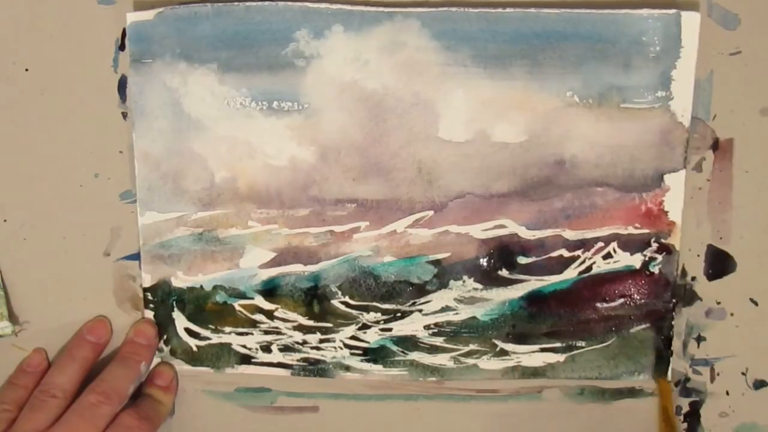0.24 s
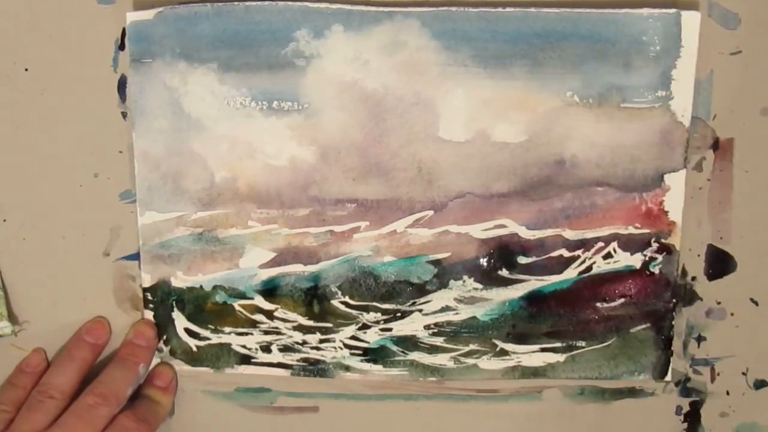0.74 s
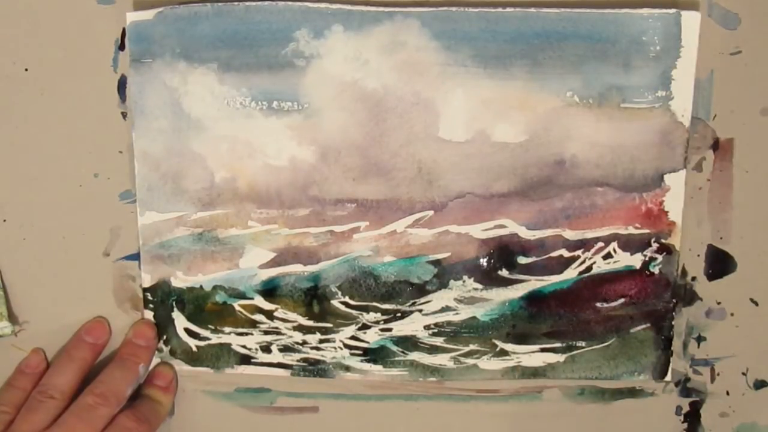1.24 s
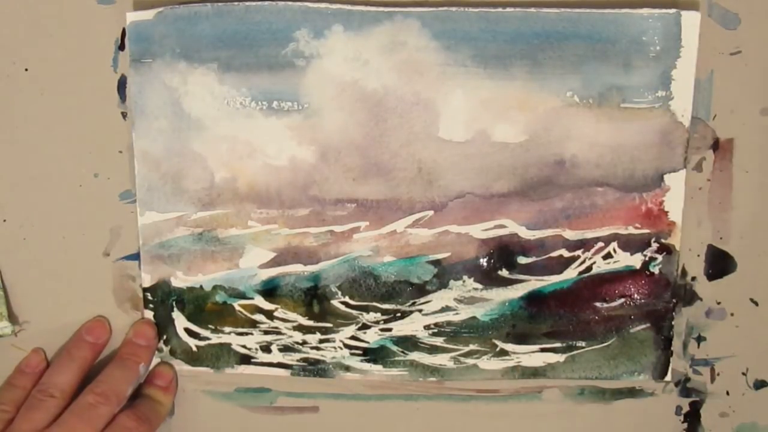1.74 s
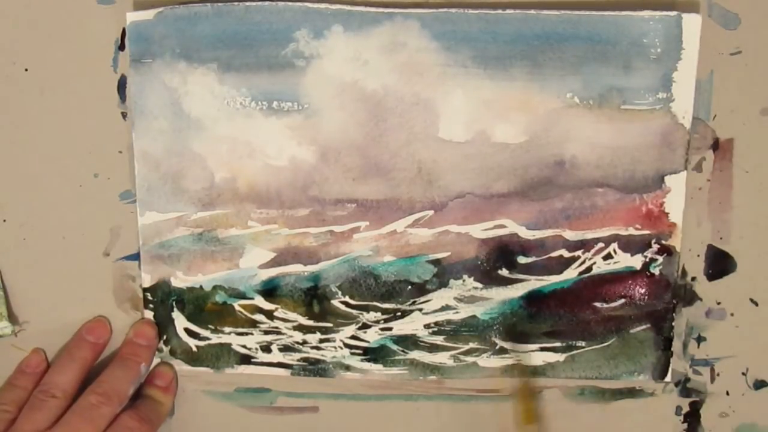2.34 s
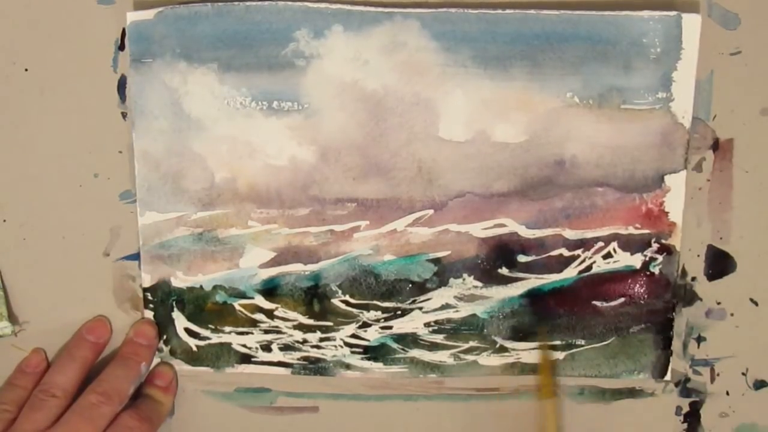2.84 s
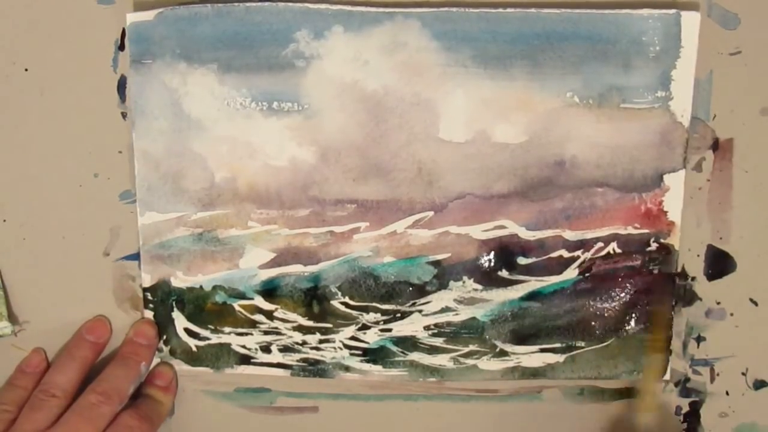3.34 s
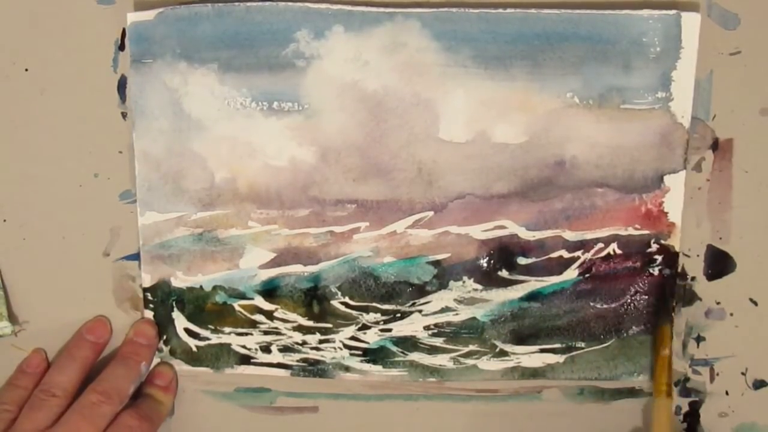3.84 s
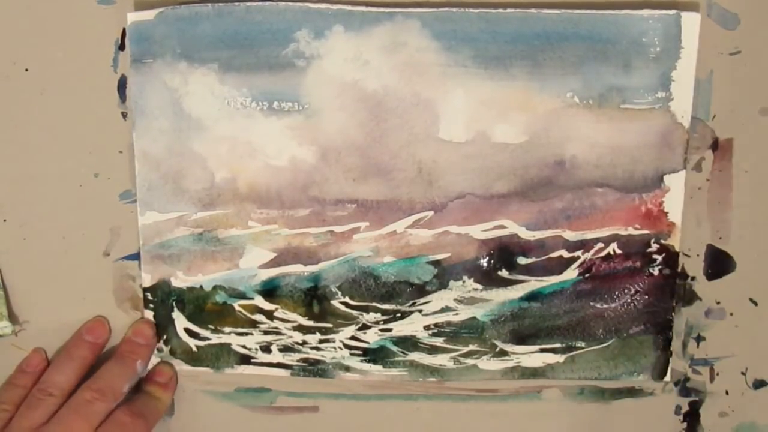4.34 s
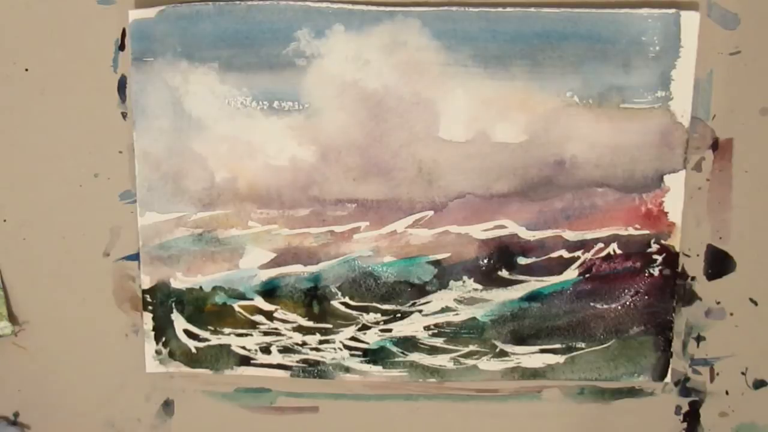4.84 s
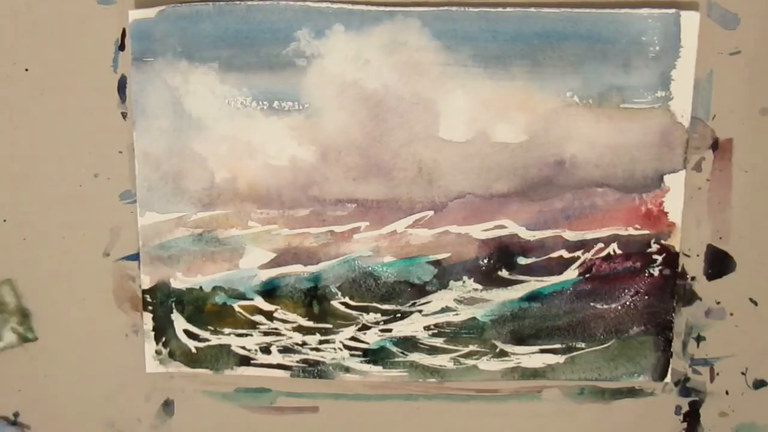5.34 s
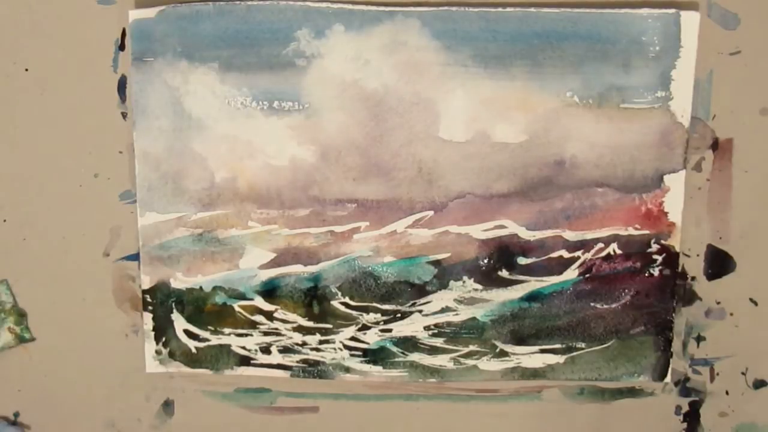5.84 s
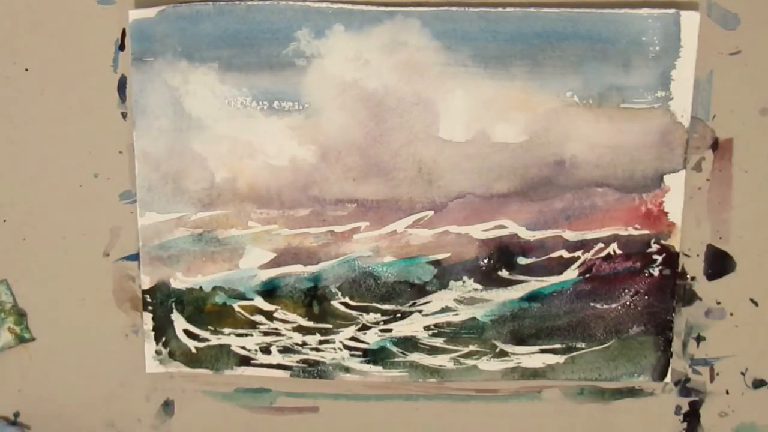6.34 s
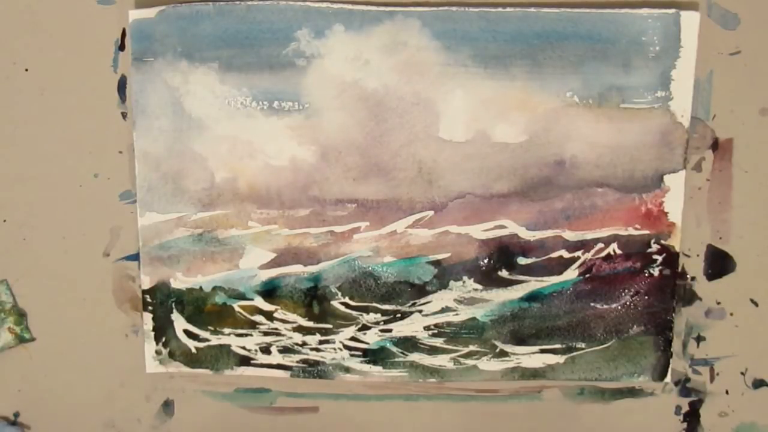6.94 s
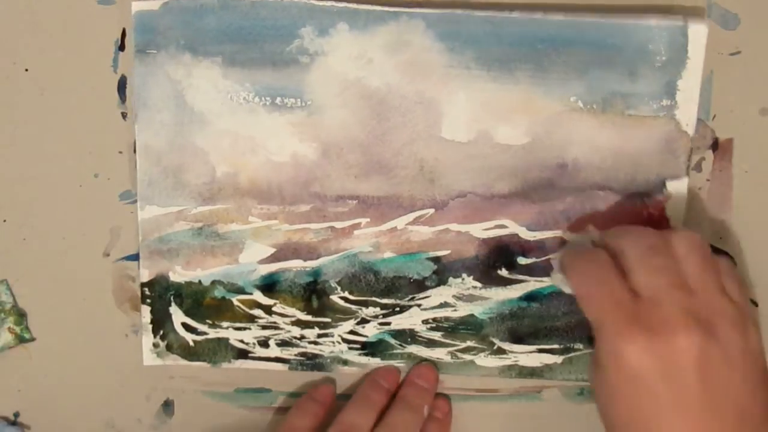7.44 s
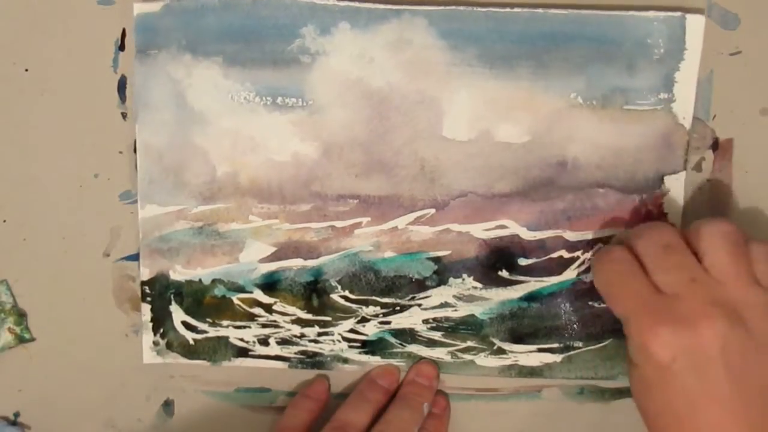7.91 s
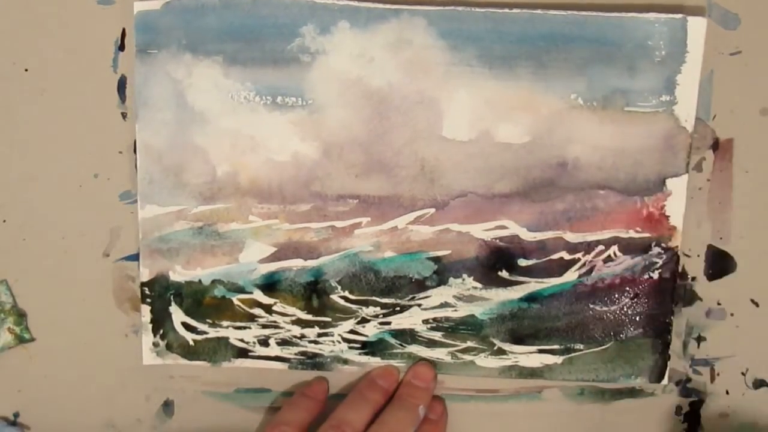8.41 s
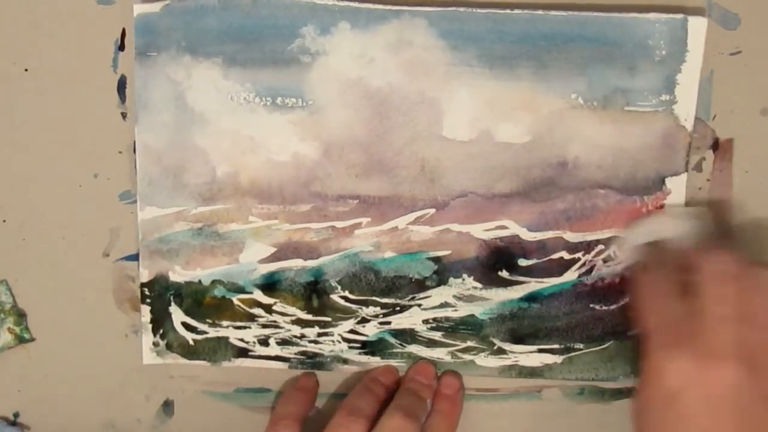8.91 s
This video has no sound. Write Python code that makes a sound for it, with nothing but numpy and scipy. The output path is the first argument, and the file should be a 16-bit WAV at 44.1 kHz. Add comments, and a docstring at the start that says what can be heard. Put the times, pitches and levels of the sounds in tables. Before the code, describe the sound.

First a short burst of bubbling as a brush is swirled in water, a pause, then several light grainy brush strokes on paper. The brush taps the glass jar sharply and swishes faintly. A thump and a stronger wooden clack follow as hard things are set on the table. Tissue crumples and pats the sheet with dull, soft touches. Close, slightly right, in a small room with steady hiss.

```python
"""A wet brush in a water jar, at a table in a small, quiet room: bubbles ring as short rising sines.
The brush also clinks on the jar (ringing modes, ticks) and strokes the paper (shaped, grainy noise).
Hard things are set on the table with a clack, and a hand pats it: modes plus smeared clicks.
A tissue rustles and dabs the sheet. Wide hiss, low wavering hum and faint tones lie behind."""
import sys
import numpy as np
from scipy import signal
from scipy.fft import rfft, irfft, next_fast_len
from scipy.io import wavfile
from scipy.ndimage import uniform_filter1d

SR = 44100
rng = np.random.default_rng(int(sys.argv[2]) if len(sys.argv) > 2 else 0)


def store_pcm(level_fs):
    """Save levels as 16-bit WAV."""
    pcm = np.round(np.clip(level_fs, -1, 1) * 32767).astype(np.int16)
    wavfile.write(sys.argv[1], SR, np.atleast_2d(pcm).T)


N = 404397

# Large air bubbles: t/s, level/dB, starting f/Hz, t60/s
BUBBLES = [(.911, -20, 1011, 0.067), (.980, -18, 1197, 0.09), (.998, -28.5, 1950, 0.021),
           (1.003, -33, 2200, 0.022), (1.014, -39.5, 2610, 0.041), (1.020, -27, 752, 0.14),
           (1.029, -20, 971, 0.045), (1.0559, -22, 1173, 0.04), (1.067, -30, 843, 0.072),
           (1.068, -30.5, 1998, 0.039), (1.070, -24, 1360, 0.048), (1.123, -47.5, 4200, 0.19),
           (1.123, -46, 3950, 0.049), (1.189, -51, 1260, 0.07), (1.236, -38.5, 1324, 0.089),
           (1.27, -35, 1003, 0.06), (1.27, -46, 2520, 0.043), (4.415, -37, 745, 0.052),
           (4.495, -48, 717, .06), (4.541, -39.5, 820, 0.063), (4.573, -43.5, 2760, 0.084),
           (4.587, -38.5, 838, 0.054), (4.589, -38.5, 1360, 0.056), (4.590, -34, 4270, 0.014),
           (4.592, -46, 1030, 0.035), (4.61, -46, 2870, 0.15), (4.63, -40.5, 1192, 0.11),
           (4.685, -43, 1190, 0.04)]
# Brush stirs, each shedding a swarm of tiny bubbles: t of height/s, typical level/dB, build/(dB/s), decay/(dB/s)
STIRS = [(.915, -41, 1503, 120), (1.075, -34, 220, 183), (1.24, -48, 69.5, 160), (4.59, -40.5, 70, 118)]
SWARM_PER_S, SWARM_HZ, SWARM_LOG_SPREAD = 175, 1514, 0.409
SWARM_RANGE_DB = 18  # below the height, where a stir begins and ends
BUBBLE_ONSET_S = 0.001

# Brush touches the jar: t/s, glass level/dB, ferrule level/dB, tick level/dB
CLINKS = [(.911, -70, -62, -45), (.980, -79, -50, -43.5), (1.0144, -73, -32, -43),
          (4.3072, -34, -31, -19.5), (4.3157, -28, -18.5, -21), (4.411, -40, -58, -41),
          (4.528, -57, -51, -42.5), (4.575, -62, -55, -54)]
# Soft bumps of wet bristles, waking only the lowest glass mode: t/s, level/dB
BUMPS = [(4.543, -40), (4.61, -42)]
# Glass jar modes: f/Hz, level/dB, t60/s
GLASS_MODES = [(1571, -5, .23), (2095, -18, .16), (2668, 2, .09), (2748, -11, .1), (2794, -11, .11),
               (3258, -2.5, .35), (3315, -18, .22), (5180, -10, .08), (6146, -13, .14)]
# Metal ferrule modes: f/Hz, level/dB, t60/s
FERRULE_MODES = [(9300, -46, 0.047), (9572, -27, 0.08), (9730, -41, 0.061), (10000, -26, 0.098)]
# Dense ferrule modes, spectral density: f/Hz, level/dB per Hz
FERRULE_DENSE = [(2000, -54), (5000, -7.5), (7800, -5.5), (9000, -1), (9700, 9), (10500, -7), (12000, -19),
                 (16000, -31)]
# Contact tick, spectral density: f/Hz, level/dB per Hz
TICK_COLOUR = [(100, -62), (300, -16.5), (900, -7.5), (2400, 2.5), (4000, -1), (5300, 3), (7000, -1.5),
               (10000, -9.5), (12000, -11), (16000, -29)]

# Blows on the table: t/s, board level/dB, hard clack level/dB, soft push level/dB, tick level/dB
KNOCKS = [(.102, -80, -67, -83, -49), (3.035, -55, -80, -63, -80), (3.0923, -75, -51.5, -78, -36),
          (3.768, -83, -64, -85, -46.5), (5.0923, -64, -57, -80, -27.5), (5.263, -57, -49, -73, -37.5),
          (5.309, -60, -71, -78, -44), (5.3961, -16, -46, -48, -37), (5.3991, -28, -31, -80, -26.5),
          (6.3643, -20, -11.5, -58, -18.5), (7.517, -45, -43, -53.5, -63), (7.726, -46, -45, -50.5, -56),
          (7.958, -54, -44, -39.5, -62), (7.971, -43, -56, -47, -60), (8.011, -48, -62, -53, -58),
          (8.94, -63, -72, -51.5, -64)]
# Table top modes: f/Hz, level/dB, t60/s
BOARD_MODES = [(243, -19, .11), (378, -1.5, .12), (440, -9, .08), (503, -4, .09), (575, -6, .1),
               (640, -14, .07), (836, -16, .08), (958, -15, .1), (1385, -11, .07), (1700, -17, .06)]
# Modes of hard things set on the table: f/Hz, level/dB, t60/s
CLACK_MODES = [(745, -18, .26), (775, -19, .24), (1890, -18, .05), (2865, -13, .04), (3075, -15, .04),
               (3195, -10, .04), (5030, -18, .05)]
# Slow flexing modes of the table: f/Hz, level/dB, t60/s
FLEX_MODES = [(67.4, -4, 0.17), (126, -1, 0.076), (219, -0.5, 0.094), (347, 6, 0.076)]
# Dense short-lived table top modes, spectral density: f/Hz, level/dB per Hz
BOARD_DENSE = [(100, -48), (200, -8.5), (340, -4.5), (560, 0), (950, -6), (1400, -12), (2200, -21),
               (5000, -42), (12000, -73)]
# Dense short-lived modes of the hard things, spectral density: f/Hz, level/dB per Hz
CLACK_DENSE = [(150, -24.5), (400, 3.5), (900, 1.5), (2200, -2.5), (3200, 0), (4500, -3.5), (5800, -16),
               (8500, -23.5), (14000, -65)]
# Dull pat of a hand on the sheet, spectral density: f/Hz, level/dB per Hz
PAT_COLOUR = [(60, -14), (170, -11), (330, 2), (480, -10), (780, 6.5), (1200, -12), (2000, -18),
              (8000, -47)]

# Wet bristle strokes on paper: start t/s, length/s, level/dB, treble re level/dB
STROKES = [(0, 0.12, -63.5, -2), (2.365, 0.18, -41.5, -1.5), (2.715, 0.21, -53.5, -9),
           (2.835, 0.16, -44.5, -18.5), (2.915, 0.089, -49.5, -22), (2.975, 0.14, -47, -9),
           (3.325, .11, -51.5, -6.5)]
# Bristle noise, spectral density: f/Hz, level/dB per Hz
BRISTLE_COLOUR = [(150, -47), (250, -19), (353, -12), (499, -17.5), (705, -7.5), (897, -16.5), (1670, -8.5),
                  (2130, 1.5), (3060, -5), (3890, 1), (10200, -9.5), (15500, -32)]
# Hand slides, tissue crumples and dabs: start t/s, length/s, level/dB, treble re level/dB
RUSTLES = [(5.05, 0.18, -51.5, -5), (5.19, 0.23, -49, -3), (5.55, 0.5, -53, -7.5), (5.95, 0.17, -54, -9.5),
           (6.15, 0.29, -55.5, -6), (6.52, 0.26, -49, -5.5), (6.67, 0.44, -49.5, -3.5),
           (7.01, 0.16, -49.5, -3), (7.13, 0.29, -52.5, -2.5), (7.455, 0.15, -44, -9.5),
           (7.68, 0.091, -51, -9), (7.94, 0.055, -43.5, -18), (7.995, 0.072, -44, -4),
           (8.25, .5, -58.5, -6), (8.88, 0.15, -48, -4.5), (9.14, .055, -47, -3)]
# Tissue noise, spectral density: f/Hz, level/dB per Hz
TISSUE_COLOUR = [(120, -49), (200, -18), (827, -3.5), (923, -4.5), (1400, -3.5), (1510, -2), (2560, 0.5),
                 (2900, -0.5), (8500, -1.5), (15500, -17)]
# Attack and release as shares of a rub's length; exponent of the release
RUB_ATTACK_SHARE, RUB_RELEASE_SHARE, RUB_BEND = 0.21, 0.6, 0.79

# Decay of the room's reflections: f/Hz, t60/s
ROOM_T60 = [(100, 0.37), (350, 0.31), (900, 0.45), (2000, 0.39), (4000, .36), (8000, 0.29), (15000, 0.13)]

# Hiss alike in both ears, spectral density: f/Hz, level/dB per Hz
HISS_MID_COLOUR = [(53, -8), (90, -4.5), (249, -4), (289, -3.5), (367, -3.5), (486, -7), (749, -3.5),
                   (1530, -3.5), (1820, -5), (1940, -3.5), (2410, -9.5), (2630, -5.5), (15800, -16.5)]
# Hiss opposed between the ears, spectral density: f/Hz, level/dB per Hz
HISS_SIDE_COLOUR = [(30, 2), (70, -4.5), (140, -0.5), (300, -0.5), (800, 1), (1300, -1), (2400, -6),
                    (4800, -13), (9000, -20), (15800, -29)]
HISS_MID_DB, HISS_SIDE_DB = -58.5, -46.5
# Faint electrical tones: f/Hz, rms level/dB
WHINES = [(1903, -74), (15734, -83)]
# Low hum of the room, spectral density: f/Hz, level/dB per Hz
HUM_COLOUR = [(25, -53), (39, -14), (46, 9), (52, 4.5), (62, -12), (110, -37), (300, -81)]
# Hum swells: t of height/s, width/s, level/dB (before the ear gains)
HUM_SWELLS = [(.7, 0.14, -64), (1.1, 0.087, -60), (2.0, 0.17, -63.5)]
HUM_DB, HUM_WAVER_DB, HUM_WAVER_HZ = -68, 1.8, 0.86  # level before the ear gains
EDGE_HZ = 15950


def water():
    """Large bubbles over a swarm of small, quick ones that builds and dies with each stir."""
    near, swarm = np.zeros((2, N))
    for t_s, level_db, hz, t60_s in BUBBLES:
        add(near, t_s, bubble(level_db, hz, t60_s, rise=0.016))
    for t_s, top_db, build_db_s, decay_db_s in STIRS:
        first_s, last_s = -SWARM_RANGE_DB / build_db_s, SWARM_RANGE_DB / decay_db_s
        offsets_s = np.arange(first_s, last_s, 1 / SWARM_PER_S)
        for offset_s, (late, pitch, strength) in zip(offsets_s, rng.standard_normal((256, 3))):
            hz = SWARM_HZ * np.exp(SWARM_LOG_SPREAD * max(pitch, -1.6))
            level_db = top_db + min(build_db_s * offset_s, -decay_db_s * offset_s)
            level_db += 3 * strength - 3 * max(pitch, 0)  # high ones weaker
            sound = bubble(level_db, hz, t60_s=45 / hz, rise=0.12)
            add(swarm, t_s + offset_s + 0.003 * late, sound)
    x = radiated(near + swarm, low_hz=513)
    direct = place(x, right_db=4.0, lead_rad=1.0)
    return direct + room(x, wet_db=-3.0, right_db=6.5, alike=0.05)


def bubble(level_db, hz, t60_s, rise):
    """A trapped bubble rings as a short sine, rising in pitch as it nears the surface."""
    t = np.arange(SR // 4) / SR
    envelope = amp(level_db - 60 * t / t60_s) * (1 - np.exp(-t / BUBBLE_ONSET_S))
    cycles = hz * (t + rise * t ** 2 / t60_s)
    return envelope * np.sin(2 * np.pi * cycles)


def jar():
    """The brush ticks on the glass; jar and ferrule ring in their modes."""
    rings, ticks = np.zeros((2, N))
    glass, ferrule, lowest = ring(GLASS_MODES), ring(FERRULE_MODES), ring(GLASS_MODES[:1])
    for t_s, glass_db, ferrule_db, tick_db in CLINKS:
        add(rings, t_s, amp(glass_db) * glass + amp(ferrule_db) * ferrule)
        add(ticks, t_s, amp(ferrule_db) * burst(FERRULE_DENSE, spread_s=0.0018))
        add(ticks, t_s, amp(tick_db) * burst(TICK_COLOUR, spread_s=0.00106))
    for t_s, level_db in BUMPS:
        add(rings, t_s, amp(level_db) * lowest)
    rings = radiated(rings, low_hz=434)
    direct = place(rings + ticks, right_db=2.5, lead_rad=0.8)
    return direct + room(amp(1.5) * rings + ticks, wet_db=-2.5, right_db=2.5, alike=0.18)


def rubbing():
    """Wet bristles drag on paper; the hand slides off the sheet, crumples a tissue and dabs with it."""
    bristles = rub(STROKES, BRISTLE_COLOUR, grain_db=1.5, grain_hz=250, usual_treble_db=-8.5)
    tissue = rub(RUSTLES, TISSUE_COLOUR, grain_db=1.7, grain_hz=150, usual_treble_db=-1)
    x = bristles + tissue
    direct = place(x, right_db=3.0, lead_rad=0.7)
    return direct + room(x, wet_db=-6.5, right_db=1.5, alike=0.22)


def rub(strokes, colour, grain_db, grain_hz, usual_treble_db):
    """Fibres catch and slip in clumps; each rub swells, holds and eases off with its own brightness."""
    out = np.zeros(N)
    hiss = noise(colour, size=N) * amp(grain_db * wander(grain_hz, size=N))
    treble = signal.sosfiltfilt(signal.butter(2, 5500, "high", fs=SR, output="sos"), hiss)
    for start_s, length_s, level_db, treble_db in strokes:
        first = max(int(start_s * SR), 0)
        last = min(int((start_s + length_s) * SR), N)
        i = np.arange(first, last)
        done = np.linspace(0, 1, len(i))
        attack = np.minimum(done / RUB_ATTACK_SHARE, 1)
        release = np.minimum((1 - done) / RUB_RELEASE_SHARE, 1) ** RUB_BEND
        treble_gain = amp(np.clip(treble_db - usual_treble_db, -13, 5))
        shaded = evened(hiss[i] + (treble_gain - 1) * treble[i])
        out[i] += amp(level_db) * attack * release * shaded
    return out


def table():
    """Blows ring the table top; hard things add a clack and a tick, a soft hand a low push."""
    top, push, high = np.zeros((3, N))
    board, clack, flex = ring(BOARD_MODES), ring(CLACK_MODES), ring(FLEX_MODES)
    for t_s, board_db, clack_db, push_db, tick_db in KNOCKS:
        add(top, t_s, amp(board_db) * board)
        add(top, t_s, amp(board_db + 0.5) * burst(BOARD_DENSE, spread_s=0.003495))
        add(push, t_s, amp(push_db) * flex)
        add(push, t_s, amp(push_db + 1.5) * burst(PAT_COLOUR, spread_s=0.006))
        add(high, t_s, amp(clack_db) * clack)
        add(high, t_s, amp(clack_db) * burst(CLACK_DENSE, spread_s=0.0025))
        add(high, t_s, amp(tick_db) * burst(TICK_COLOUR, spread_s=0.000709))
    low = radiated(top, low_hz=195) + push
    high = radiated(high, low_hz=280)
    thud = place(low, right_db=8.0, lead_rad=1.8)
    thud += room(low, wet_db=-7.5, right_db=11.5, alike=-0.13)
    hard = place(high, right_db=4.5, lead_rad=0.27)
    return thud + hard + room(high, wet_db=-5, right_db=4.0, alike=0.7)


def background():
    """Wide hiss, a low wavering hum mostly on the right, and faint electrical tones."""
    t = np.arange(N) / SR
    mid = amp(HISS_MID_DB) * noise(HISS_MID_COLOUR, size=N)
    for hz, rms_db in WHINES:
        mid += amp(rms_db) * np.sqrt(2) * np.sin(2 * np.pi * hz * t)
    side = amp(HISS_SIDE_DB) * noise(HISS_SIDE_COLOUR, size=N)
    hum_level = amp(HUM_DB + HUM_WAVER_DB * wander(HUM_WAVER_HZ, size=N))
    for t_s, width_s, level_db in HUM_SWELLS:
        hum_level += amp(level_db) * np.exp(-((t - t_s) / width_s) ** 2)
    hum = signal.hilbert(noise(HUM_COLOUR, size=next_fast_len(N)))[:N]
    hum = evened(hum.real / (abs(hum) + 0.5)) * hum_level  # envelope partly flattened
    left = mid + side - amp(-2.0) * hum
    right = mid - side + amp(9.5) * hum
    return np.array([left, right])


def ring(modes):
    """Struck body: sum of dying sines, neighbouring modes swinging in opposite senses."""
    t = event_time_s()
    out = np.zeros(len(t))
    for k, (hz, level_db, t60_s) in enumerate(modes):
        out += (-1) ** k * amp(level_db - 60 * t / t60_s) * np.sin(2 * np.pi * hz * t)
    return out


def burst(colour, spread_s):
    """Click smeared by dense modes: each frequency leaves after its own delay, spread_s on average."""
    size = 8192
    hz = np.fft.rfftfreq(size, 1 / SR)
    log_gain = np.log(amp(read(colour, hz)))
    mirrored = np.r_[log_gain, log_gain[-2:0:-1]]
    lag_rad = signal.hilbert(mirrored).imag[:len(hz)]  # makes the colour causal
    scatter = evened(uniform_filter1d(rng.standard_normal(len(hz)), size=40))
    delay_s = spread_s * scatter ** 2
    phase_rad = lag_rad + 2 * np.pi * np.cumsum(delay_s) * hz[1]
    x = irfft(np.exp(log_gain - 1j * phase_rad))[:size // 2]
    return x * np.sqrt(spread_s * SR) / np.linalg.norm(x)


def radiated(x, low_hz):
    """High-pass: a small body radiates little below its lowest modes."""
    return signal.sosfilt(signal.butter(3, low_hz, "high", fs=SR, output="sos"), x)


def place(x, right_db, lead_rad):
    """Off-centre sound: louder on the right, while the left leads in phase."""
    z = signal.hilbert(x, next_fast_len(N))[:N]
    left = amp(-right_db / 2) * (z * np.exp(1j * lead_rad)).real
    right = amp(right_db / 2) * x
    return np.array([left, right])


def room(x, wet_db, right_db, alike):
    """Dense reflections of a small room; each band dies at its own speed."""
    t = event_time_s()
    echoes = rng.standard_normal((2, len(t))) * (rng.random((2, len(t))) < 0.15)
    a, b = echoes * np.clip((t - 0.002) / 0.0011, 0, 1)
    alike = np.clip(alike, -1, 1)  # correlation of the ears
    pair = np.array([alike * a + np.sqrt(1 - alike ** 2) * b, a])
    hz, frame_s, z = signal.stft(pair, SR, nperseg=256)
    decay = amp(-60 * frame_s / read(ROOM_T60, hz)[:, None])
    tail = signal.istft(z * decay, SR, nperseg=256)[1]
    ear_db = np.array([[-right_db], [right_db]]) / 2
    tail *= amp(wet_db + ear_db) / np.linalg.norm(tail[1])
    return signal.fftconvolve(x[None], tail, axes=1)[:, :N]


def noise(colour, size):
    """Noise of a given colour, rms 1."""
    n = next_fast_len(size)
    gain = amp(read(colour, np.fft.rfftfreq(n, 1 / SR)))
    return evened(irfft(rfft(rng.standard_normal(n)) * gain, n)[:size])


def wander(rate_hz, size):
    """Low-passed noise, rms 1."""
    lowpass = signal.butter(2, rate_hz, fs=SR, output="sos")
    return evened(signal.sosfilt(lowpass, rng.standard_normal(size)))


def event_time_s():
    """Time axis of one ringing event."""
    return np.arange(SR * 2 // 3) / SR


def amp(db):
    """Decibels to gain."""
    return 10 ** (np.asarray(db) / 20)


def evened(x):
    """Scales to rms 1."""
    return x / np.sqrt(np.mean(x ** 2) + 1e-20)


def read(points, hz):
    """Interpolates a table on a log-frequency axis."""
    f, value = np.transpose(points)
    return np.interp(np.log(hz + 1), np.log(f + 1), value)


def add(mix, t_s, sound):
    """Mixes a sound in at time t_s."""
    part = mix[..., max(round(t_s * SR), 0):][..., :sound.shape[-1]]
    part += sound[..., :part.shape[-1]]


def scene():
    """All sources together."""
    return water() + jar() + rubbing() + table() + background()


def record(dry):
    """Band limit: low-pass at EDGE_HZ."""
    lowpass = signal.firwin(511, EDGE_HZ, window=("kaiser", 9), fs=SR)
    return signal.oaconvolve(dry, lowpass[None], "same")


dry = scene()
out = record(dry)
store_pcm(out)
```